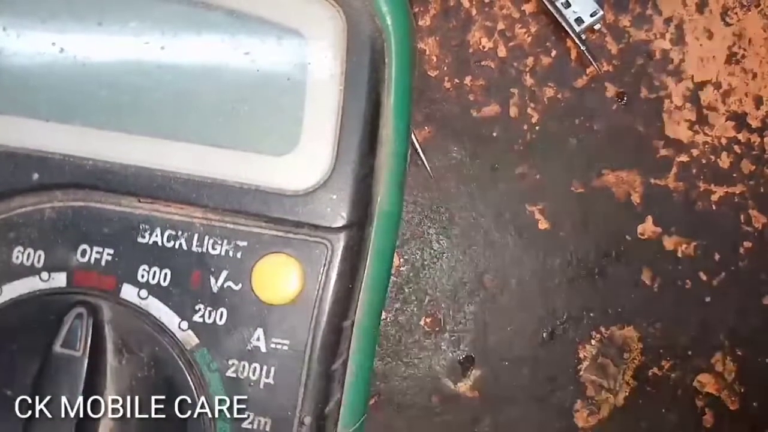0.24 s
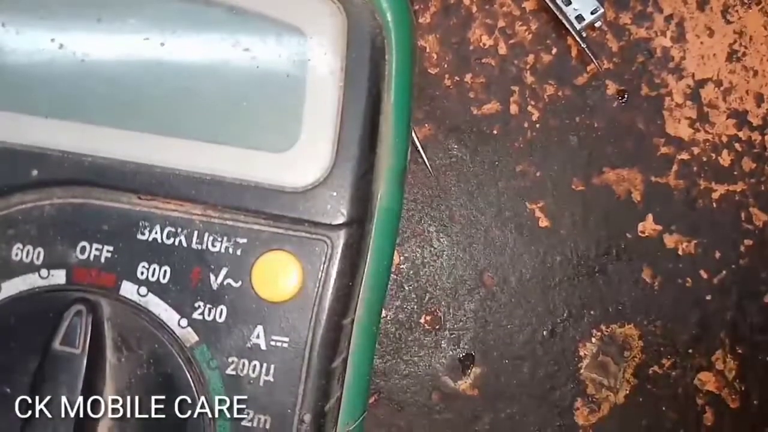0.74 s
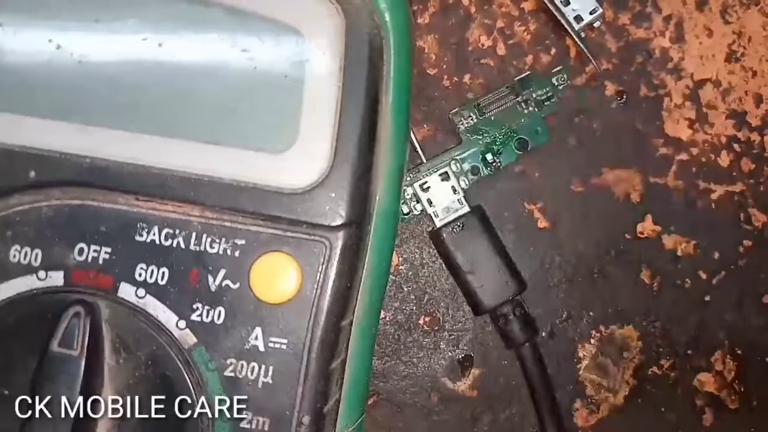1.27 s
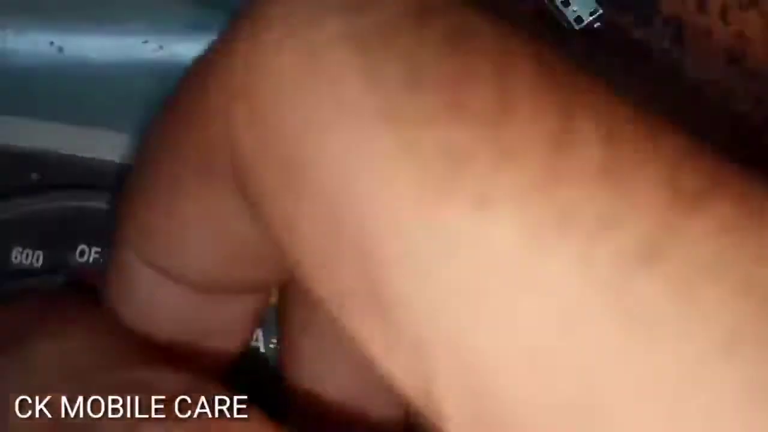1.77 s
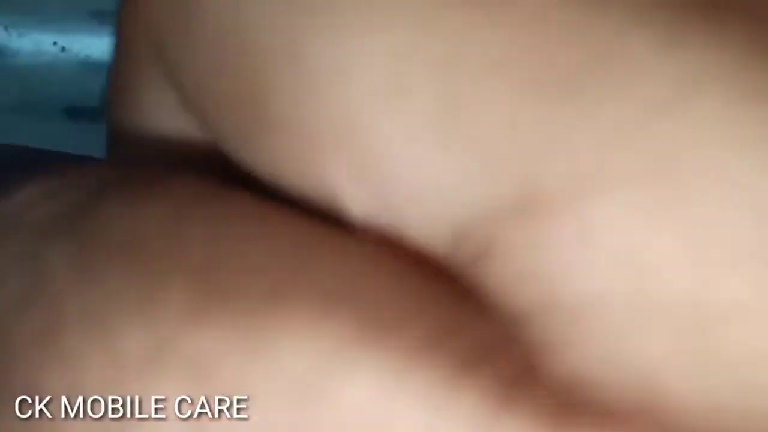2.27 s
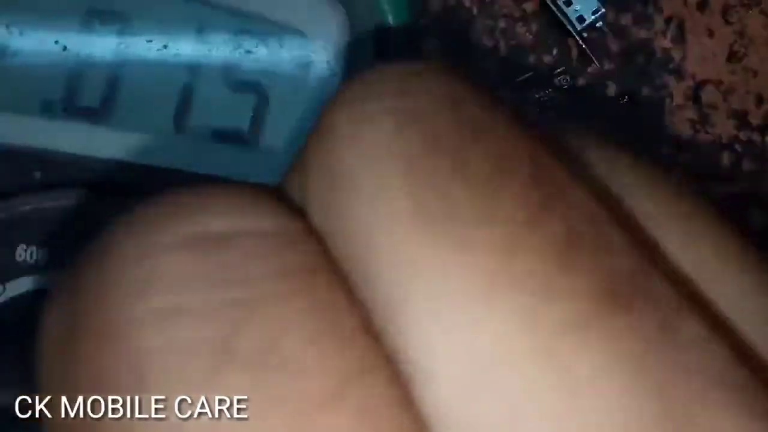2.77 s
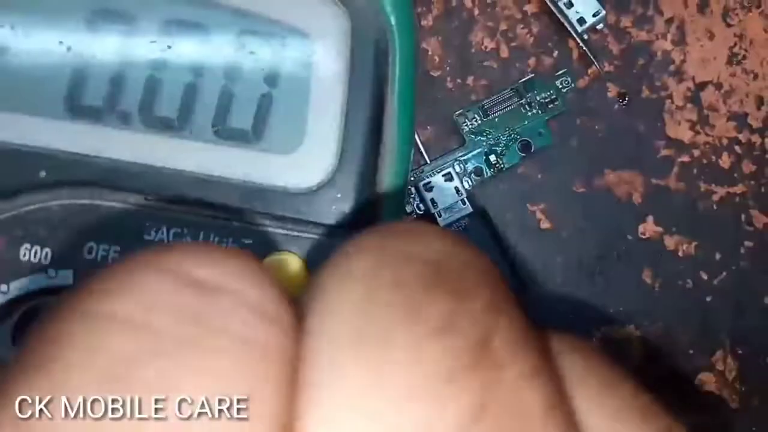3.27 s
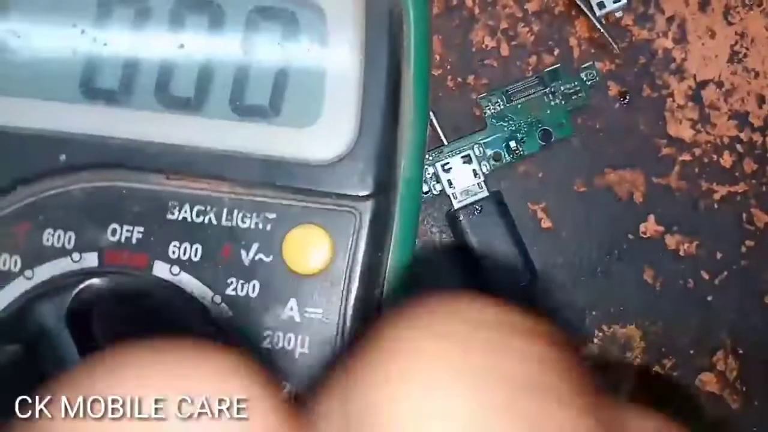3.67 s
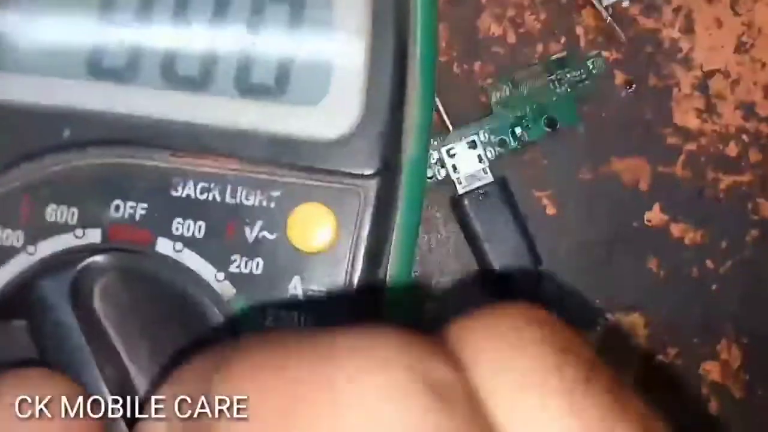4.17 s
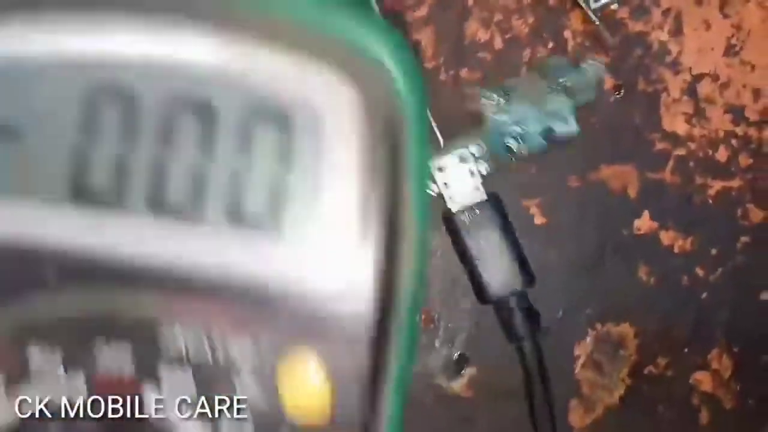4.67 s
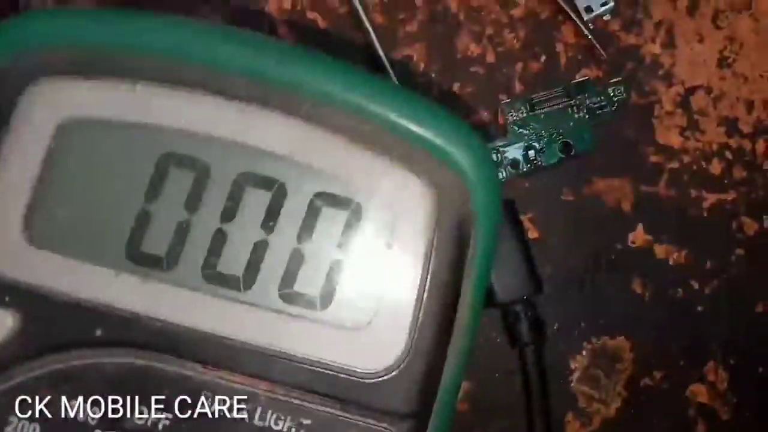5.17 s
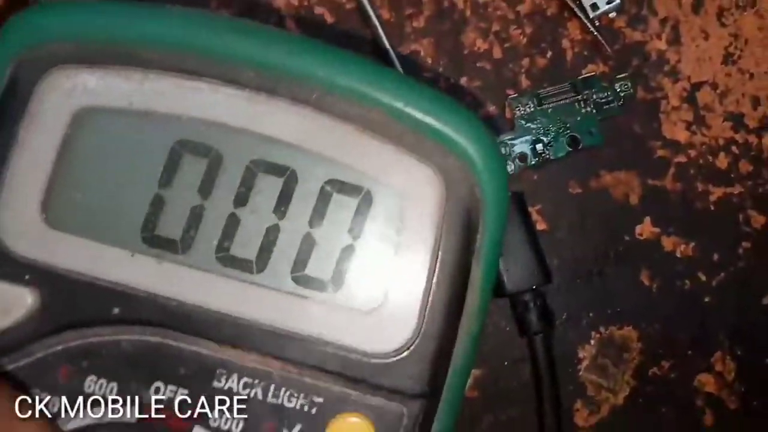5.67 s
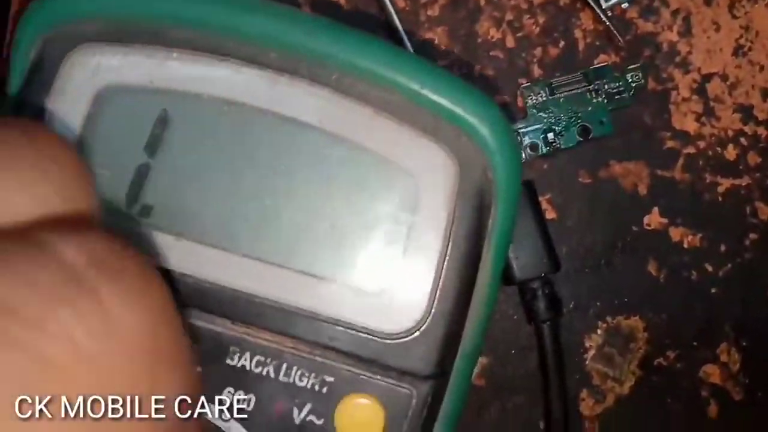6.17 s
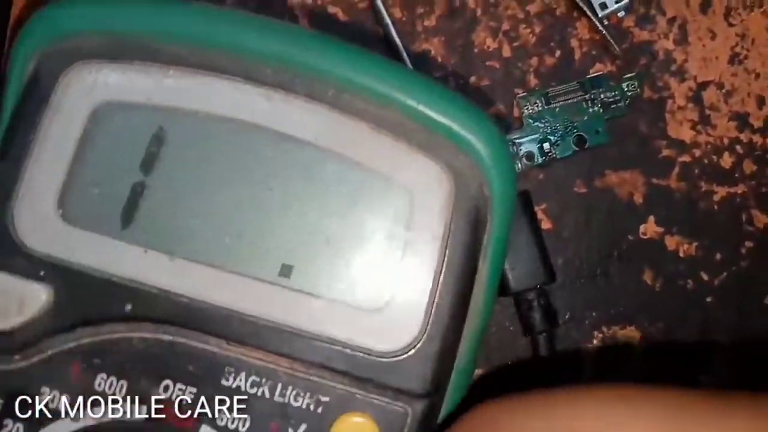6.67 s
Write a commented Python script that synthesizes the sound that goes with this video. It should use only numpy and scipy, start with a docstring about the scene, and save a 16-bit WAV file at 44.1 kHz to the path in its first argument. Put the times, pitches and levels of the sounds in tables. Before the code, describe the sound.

In the first second, a lead and plug land on a workbench with a few dull knocks, strongest at about 0.2, 0.4 and 0.7 seconds, mixed with small plastic clacks and faint rubbing. A finger taps a multimeter's case at 1.6 seconds. From 1.7 to 2.6 seconds its dial turns through seven sharp clicks, each a springy snap with a brief, hollow plastic ring, followed by a firm, duller tap at 2.7. After a pause, one click comes at 3.8 seconds, then soft knocks, taps and rubbing until about 4.6. Five more clicks run from 5.0 to 5.7 seconds, and a last three from 6.3 to 6.7. Everything is heard from close by, with the short echo of a small room and a low, steady background rush.

```python
"""Turning a multimeter's dial

A lead and plug land on a repair bench with a few dull knocks. Then the meter's dial is turned in quick
runs: its spring snaps into each notch and the plastic case rings briefly. Fingers tap and rub the case.
It is all heard from close by, in a small room with a low, steady noise."""
import sys
import numpy as np
from scipy import signal
from scipy.fft import rfft, irfft, next_fast_len
from scipy.io import wavfile
from scipy.ndimage import uniform_filter1d, minimum_filter1d

SR = 44100
rng = np.random.default_rng(int(sys.argv[2]) if len(sys.argv) > 2 else 0)


def int16_out(signal):
    """Quantize to a 16-bit WAV file."""
    q = np.round(np.clip(np.atleast_2d(signal).T, -1, 1) * 32767)
    wavfile.write(sys.argv[1], SR, q.astype(np.int16))


N = 305375

# The dial drops into a notch. Bass, middle and treble are relative to a typical click.
# start_s, level_db, bass_db, middle_db, treble_db, spring_pitch_hz
DIAL_CLICKS = [(1.7469, -4, -1, 5.5, 5, 3600), (1.846, -2, 3.5, 2, 6, 3630),
               (1.9515, -3, -1, 2.5, -1.5, 3460), (2.0988, 0, -9.5, 1.5, -2, 3560),
               (2.3056, 0.5, 3, -4, 2, 3380), (2.51, 0, 2, -5.5, 1.5, 3170),
               (2.6333, -1, -5.5, 3.5, 2.5, 3156), (3.7681, -2, -3, 3, -6, 3670),
               (4.9762, -3, -3.5, 1, 2, 3920), (5.1333, -5, -5, 2.5, 2.5, 2920),
               (5.2923, -2.5, -7, -2, 1.5, 2900), (5.5042, -1, 0.5, -4.5, -1, 3260),
               (5.7033, -0.5, 0, -3.5, -1, 3100), (6.3525, -3.5, 2.5, 2, 6, 3200),
               (6.5741, 1.5, -5, -7, -4, 3525), (6.7095, -0.5, -2.5, 0, 1.5, 3490)]


def from_db(db):
    """Turn decibels into a number to multiply by."""
    return 10 ** (np.asarray(db) / 20)


def rms_one(x):
    """Scale a sound so that its average level (rms) is 1."""
    return x / np.sqrt(np.mean(x ** 2) + 1e-20)


def at_hz(points, hz):
    """Look up a value between the rows of a table, on a scale of octaves."""
    freqs, values = np.transpose(points)
    return np.interp(np.log(hz), np.log(freqs), values)


def bands(lowest_hz, per_octave):
    """Filters that each pass one band of pitches: centre_hz, width_hz, filter."""
    count = int(per_octave * np.log2(17000 / lowest_hz))
    edges = 17000 / 2 ** (np.arange(count, -1, -1) / per_octave)
    return [(np.sqrt(lo * hi), hi - lo, signal.butter(2, [lo, hi], "band", fs=SR, output="sos"))
            for lo, hi in zip(edges, edges[1:])]


def coloured(x, colour):
    """Make each pitch stronger or weaker as the table says; the result has average level 1."""
    size = next_fast_len(N)
    hz = np.maximum(np.fft.rfftfreq(size, 1 / SR), 1)
    return rms_one(irfft(rfft(x, size) * from_db(at_hz(colour, hz)), size)[:N])


def fading_tone(hz, fade_s, t):
    """One tone of a struck object. Here and in the tables, fade_s is the time to fall by 60 dB."""
    return np.sin(2 * np.pi * hz * t) * np.exp(-np.log(1000) * t / fade_s)


def placed(rows, sounds):
    """Lay each sound at the start time in its row."""
    out = np.zeros(N + sounds.shape[1])
    for row, sound in zip(rows, sounds):
        start = int(row[0] * SR)
        out[start:start + len(sound)] += sound
    return out[:N]


def with_middle(hits, middle_db, dulling):
    """Add a middle_db column: a softer touch lasts longer, so more of it goes into the hollow middle."""
    return [(start, level, bass, middle_db - dulling * level, treble)
            for start, level, bass, treble in hits]


def force(hits, hz):
    """How strongly each hit drives one pitch, as a column."""
    anchors_hz = [190, 380, 700, 1400, 4200, 6500]
    return np.array([[from_db(level + at_hz(list(zip(anchors_hz, [bass, mid, mid, 0, 0, treble])), hz))]
                     for _, level, bass, mid, treble, *_ in hits])


def main_tones(hits, tones, t, scatter_db, detune):
    """Each hit rings all of an object's own tones; the grip shifts their strength and pitch a little."""
    out = 0
    for k, (hz, db, fade_s) in enumerate(tones):
        strength, shift = rng.standard_normal((len(hits), 2)).T[:, :, None]
        gain = force(hits, hz) * from_db(db + scatter_db * strength)
        out = out + (-1) ** (k + 1) * gain * fading_tone(hz * (1 + detune * shift), fade_s, t)
    return out


def crowded_tones(hits, colour, fades, t, snap_db, snap_s, rise_s):
    """Tones too close to tell apart, made from noise: a snap, then a ring that dies band by band."""
    out, power = 0, 0
    noise = rng.standard_normal((len(hits), 2, len(t)))
    snap = from_db(snap_db) * np.exp(-(t / snap_s) ** 2)
    rise = 1 - np.exp(-t / rise_s)
    for k, (hz, width, band) in enumerate(bands(lowest_hz=600, per_octave=5)):
        ring = np.exp(-np.log(1000) * t / at_hz(fades, hz))
        burst = signal.sosfilt(band, noise[:, k % 2] * (ring + snap) * rise)
        burst /= np.linalg.norm(burst, axis=1, keepdims=True)
        share = from_db(at_hz(colour, hz)) * np.sqrt(width)
        uneven = from_db(rng.normal(0, 1.9, (len(hits), 1)))  # no two hits sound alike
        out = out + share * uneven * force(hits, hz) * burst
        power += share ** 2
    return out / np.sqrt(power)


def room_noise():
    """A dull, steady rush with a few faint drones in it."""
    # Tone colour of the rush: pitch_hz, level_db
    colour = [(25, -18.5), (50, -9.5), (80, -4), (125, 5.5), (190, -8), (280, -9), (420, -10.5), (600, -5),
              (800, -14), (1200, -18.5), (1650, -17), (3500, -26), (4200, -35.5), (5200, -60.5),
              (16000, -66.5)]
    # Narrow bands of droning noise: pitch_hz, width_hz, level_db
    drones = [(123.5, 20, -69.5), (202.2, 6.2, -62.5), (628, 31, -68.5)]
    out = from_db(-46.5) * coloured(rng.standard_normal(N), colour)
    for hz, width, db in drones:
        b, a = signal.iirpeak(hz, hz / width, fs=SR)
        out = out + from_db(db) * rms_one(signal.lfilter(b, a, rng.standard_normal(N)))
    return out


def bench_knocks():
    """Things land on the bench; the board booms on, but is too small to give off deep bass."""
    # Knocks on the bench top: start_s, level_db, bass_db, treble_db
    knocks = [(0.1958, -7, 4, -7), (0.2613, -30, 20, -8), (0.2953, -24, 20, -20), (0.3703, -24.5, 18.5, 16),
              (0.3971, -8, -1, -12), (0.4368, -24, 12, -8), (0.4605, -27, -7, 13), (0.7158, -8.5, 9.5, 6.5),
              (0.7313, -12.5, -12, 1), (0.9583, -28.5, 6.5, 15), (3.7863, -25, 17, 3), (3.848, -48, 18, 2),
              (3.9053, -38, 20, -2), (4.1593, -40.5, 17, 6)]
    # The board's main tones: pitch_hz, level_db, fade_s
    tones = [(99, -20, 0.067), (131.3, -20, 0.26), (159, -18, 0.063), (217, -17, 0.17),
             (273.5, -15.5, 0.062), (339, -15, 0.086), (421.6, -23.5, 0.2), (540.4, -14.5, 0.077),
             (598, -23, 0.23), (791, -12, 0.032), (880, -19.5, 0.13), (1430, -19.5, 0.069),
             (1680, -18, 0.038), (2100, -26.5, 0.064)]
    # Strength of its crowded upper tones: pitch_hz, level_db
    colour = [(600, 12), (900, 4), (1150, 1.5), (1600, -0.5), (2400, -2), (3400, -3), (4200, -16.5),
              (5400, -71), (8000, -34.5), (10500, -105), (16000, -64)]
    # How long those ring: pitch_hz, fade_s
    fades = [(600, 0.039), (2000, 0.069), (8000, 0.093), (15000, .05)]
    t = np.arange(SR // 3) / SR
    hits = with_middle(knocks, middle_db=1.0, dulling=0.076)
    contact = crowded_tones(hits, colour, fades, t, snap_db=-14.0, snap_s=0.0026, rise_s=0.00048)
    boom = main_tones(hits, tones, t, scatter_db=1.5, detune=0.0057)
    boom = signal.sosfilt(signal.butter(2, 85, "high", fs=SR, output="sos"), boom)
    return placed(hits, from_db(15.5) * contact + from_db(6.5) * boom)


def rubbing(slips_per_s, spread_db):
    """Cable or fingers slide on plastic, catching and letting go in many tiny, uneven slips."""
    # Strokes over the plastic: start_s, length_s, level_db
    strokes = [(0.254, 0.16, -42.5), (0.451, 0.075, -40), (0.537, 0.067, -47.5), (0.632, 0.034, -40.5),
               (0.88, 0.073, -49), (3.934, .12, -44.5), (4.13, 0.07, -48), (4.33, .05, -61),
               (5.945, 0.11, -59.5)]
    # Tone colour of the rubbing: pitch_hz, level_db
    colour = [(200, 16.5), (900, 14.5), (1400, 12), (2300, 10), (3800, -1), (5500, -23), (8300, -23.5),
              (10500, -32), (16000, -32)]
    swell_s, fall_db_per_s, slip_ring_s = 0.032, 326, 0.0036
    sizes = from_db(spread_db * np.minimum(rng.exponential(1, N), 4)) * rng.choice([-1, 1], N)
    slips = sizes * (rng.random(N) < slips_per_s / SR)
    keep = np.exp(-1 / (slip_ring_s * SR))
    energy = signal.lfilter([1], [1, -keep], slips ** 2 + 1e-18)
    grains = np.sqrt(energy) * rng.standard_normal(N)
    t = np.arange(N) / SR
    pressure = 0
    for start, length, db in strokes:  # each swells, holds while the hand moves, then dies away
        swell = np.clip((t - start) / swell_s, 0, 1)
        pressure = pressure + swell * from_db(db - fall_db_per_s * np.maximum(t - start - length, 0))
    return coloured(grains, colour) * pressure


def meter_case(hits, snap_db, snap_s, rise_s, crack_db, ring_db):
    """A hit on the plastic case makes a bright crack over a hollow ring."""
    # The case's main tones: pitch_hz, level_db, fade_s
    tones = [(94.8, -19, 0.056), (191.8, -16, 0.041), (349, -16.5, 0.04), (464.8, -15.5, 0.041),
             (588.4, -18.5, 0.044), (682, -26, 0.076), (898, -19.5, 0.036), (970, -30, 0.052),
             (1673, -18.5, 0.045), (1940, -27, 0.073), (2159, -25, 0.053), (2427, -28, 0.045),
             (2607, -26.5, 0.064), (3094, -31.5, 0.081), (3510, -27, 0.071), (3714, -22.5, 0.063),
             (4130, -35, 0.082), (4470, -30.5, 0.057)]
    # Strength of its crowded upper tones: pitch_hz, level_db
    colour = [(600, 0.5), (850, -8.5), (1300, -2), (1700, 2.5), (2400, 2.5), (3400, 1), (4500, -5),
              (5400, -25.5), (6300, -16.5), (8000, -16), (9100, -19.5), (10000, -37.5), (12000, -31),
              (14000, -25.5), (16000, -33)]
    # How long those ring: pitch_hz, fade_s
    fades = [(600, 0.039), (3000, 0.042), (8000, .042), (15000, 0.044)]
    t = np.arange(SR // 8) / SR
    crack = crowded_tones(hits, colour, fades, t, snap_db, snap_s, rise_s)
    ring = main_tones(hits, tones, t, scatter_db=2.0, detune=0.008) * (1 - np.exp(-t / rise_s))
    return placed(hits, from_db(crack_db) * crack + from_db(ring_db) * ring)


def finger_taps():
    """Fingers and the knob tap the case lightly, with only a little snap."""
    # Taps on the case: start_s, level_db, bass_db, treble_db
    taps = [(0.3398, -21, 4, 2), (0.505, -28, -3, 6.5), (0.9309, -18.5, 13.5, -5.5), (1.597, -8.5, 5, 0.5),
            (2.0778, -23.5, 22, -20), (2.6985, -2, -2, -40), (2.7263, -32.5, 26, -20),
            (4.1426, -34.5, -12, 0), (4.1878, -18.5, 9, -4), (4.5935, -32.5, 5, -18),
            (5.876, -31.5, -3.5, -15.5), (6.5303, -24, 8, -21)]
    hits = with_middle(taps, middle_db=-3.0, dulling=0.44)
    return meter_case(hits, snap_db=-6.0, snap_s=0.002, rise_s=0.00039, crack_db=3.5, ring_db=-2.5)


def plastic_clacks(level_db, rise_s, scatter_db):
    """Small, hard plastic parts meet and ring briefly; the smaller the part, the higher it rings."""
    # Parts clacking together: start_s, level_db, main_pitch_hz
    clacks = [(.3975, -5.5, 1460), (.437, -16.5, 1510), (.461, -29, 1540), (.474, -26.5, 2130),
              (.486, -37, 2250), (.959, -31, 1670), (2.078, -18.5, 1490), (2.727, -33, 1537),
              (3.769, -13.5, 1104), (4.085, -31.5, 2080), (4.143, -37, 2220), (4.188, -19, 2156),
              (6.354, -14, 1120)]
    # The tones of a part: times_main_pitch, level_db, fade_s
    tones = [(.45, -2.5, .03), (.58, -7, 0.029), (.7, -6.5, 0.034), (.83, -5, 0.027), (1, 2, 0.035),
             (1.14, -5, 0.033), (1.33, -7, 0.035), (1.65, -9, 0.029), (2.1, -22, 0.026)]
    t = np.arange(SR // 10) / SR
    _, db, hz = np.transpose(clacks)[:, :, None]
    scatter = scatter_db * rng.standard_normal((len(clacks), len(tones)))
    rings = sum((-1) ** k * from_db(db + tone_db + scatter[:, [k]]) * fading_tone(hz * ratio, fade_s, t)
                for k, (ratio, tone_db, fade_s) in enumerate(tones))
    return placed(clacks, from_db(level_db) * rings * (1 - np.exp(-t / rise_s)))


def dial_snaps():
    """The dial's spring snaps into each notch and gives the case a sharp hit."""
    return meter_case(DIAL_CLICKS, snap_db=5.0, snap_s=0.0013, rise_s=0.00048, crack_db=10.0, ring_db=0.5)


def dial_spring(ring_db, fade_s):
    """The spring itself pings for a moment, at a different pitch in each notch."""
    growth = 1.47  # a harder snap rings more: extra dB of ring for each dB of snap
    t = np.arange(SR // 10) / SR
    rise = 1 - np.exp(-t / 0.001)
    pings = [from_db(level + growth * level + ring_db) * fading_tone(hz, fade_s, t) * rise
             for _, level, *_, hz in DIAL_CLICKS]
    return placed(DIAL_CLICKS, np.array(pings))


def room_echo(x):
    """The room stores the energy in each band and lets it leak away as a soft wash of sound."""
    # Strength of the echo: pitch_hz, level_db
    colour = [(100, -12), (500, -11.5), (1100, -19), (3200, -19), (4300, -20), (5500, -28.5), (6600, -19),
              (8000, -21.5), (9000, -19.5), (10500, -29), (12000, -24), (14500, -22.5)]
    # How long it lasts: pitch_hz, fade_s
    fades = [(100, 0.3), (600, 0.41), (3000, 0.58), (8500, 0.42), (15000, .3)]
    out, noise = 0, rng.standard_normal((2, N))
    for k, (hz, _, band) in enumerate(bands(lowest_hz=60, per_octave=5)):
        keep = np.exp(-np.log(10 ** 6) / (at_hz(fades, hz) * SR))
        stored = signal.lfilter([1 - keep], [1, -keep], signal.sosfilt(band, x) ** 2)
        wash = signal.sosfilt(np.vstack([band, band]), noise[k % 2])
        out = out + from_db(at_hz(colour, hz)) * np.sqrt(stored) * rms_one(wash)
    return out


def scene():
    """Add the dial and the handling sounds to the room's echo and noise, in one channel."""
    dial = dial_snaps() + dial_spring(ring_db=-1.5, fade_s=0.016)
    handling = finger_taps() + bench_knocks()
    handling += plastic_clacks(level_db=-2.5, rise_s=0.0003, scatter_db=4.0)
    handling += rubbing(slips_per_s=490, spread_db=1.0)
    direct = dial + handling
    return (direct + room_echo(direct) + room_noise())[None]


def record(dry):
    """The microphone loses the deepest bass, a fast limiter turns peaks down, and the top is cut."""
    ceiling, span_samples, top_hz = 0.9, 65, 16000
    thin = signal.sosfilt(signal.butter(2, 45, "high", fs=SR, output="sos"), dry)
    gain = np.minimum(1, ceiling / (np.abs(thin) + 1e-9))
    smooth_gain = uniform_filter1d(minimum_filter1d(gain, span_samples), span_samples)
    return signal.sosfilt(signal.ellip(10, 0.1, 80, top_hz, fs=SR, output="sos"), thin * smooth_gain)


dry = scene()
out = record(dry)
int16_out(out)
```